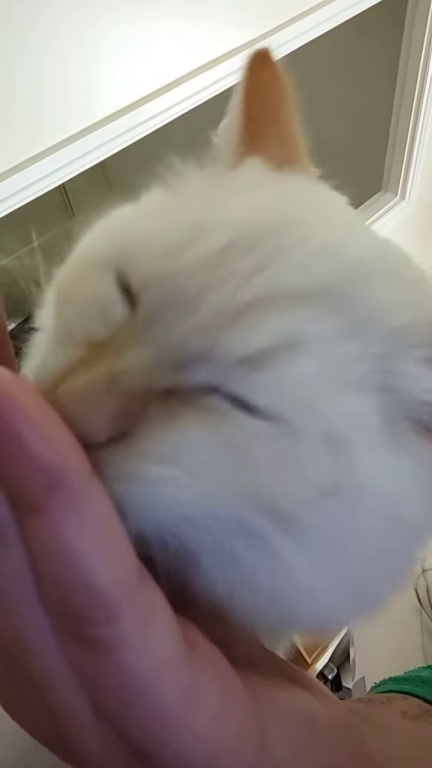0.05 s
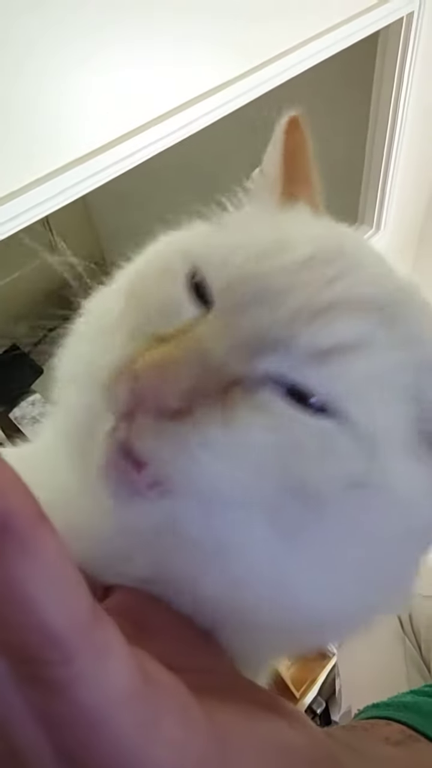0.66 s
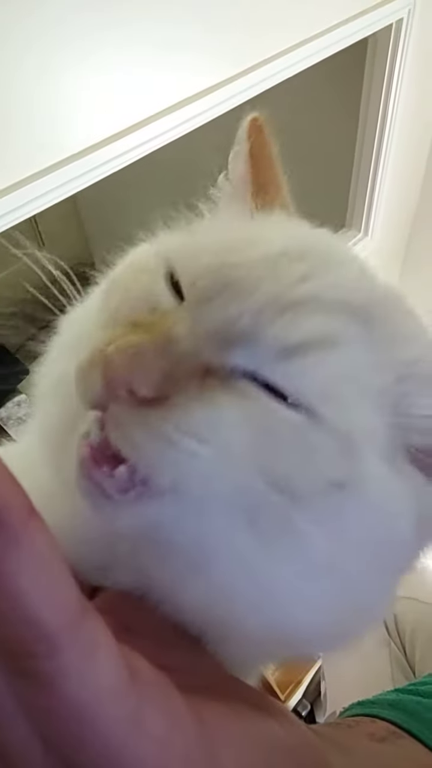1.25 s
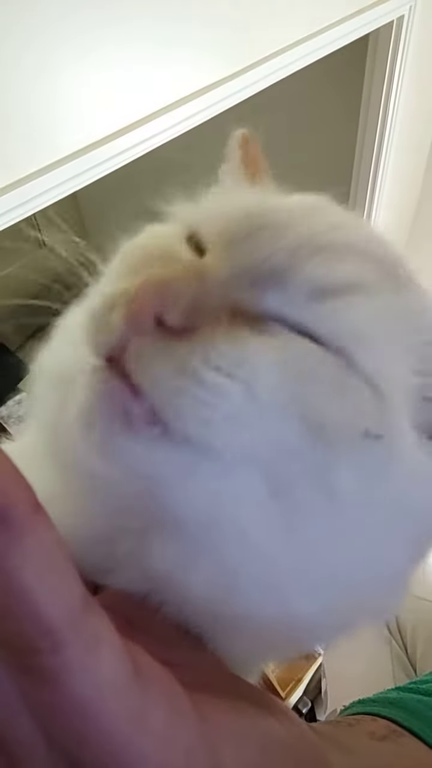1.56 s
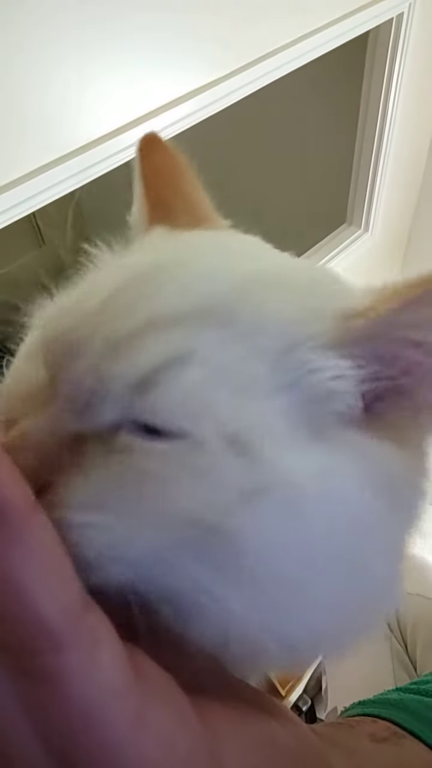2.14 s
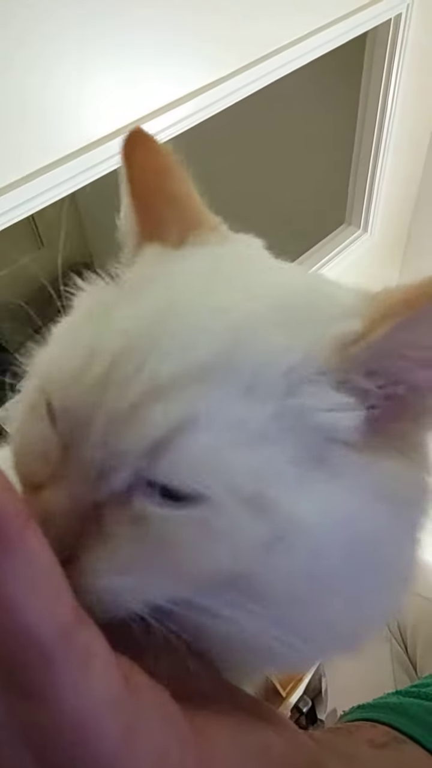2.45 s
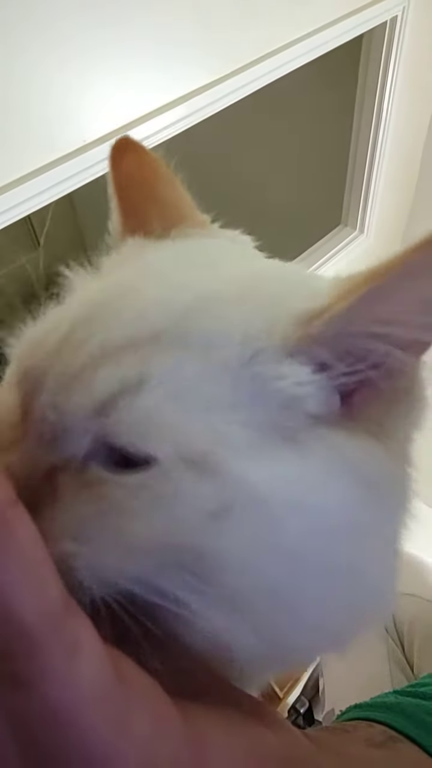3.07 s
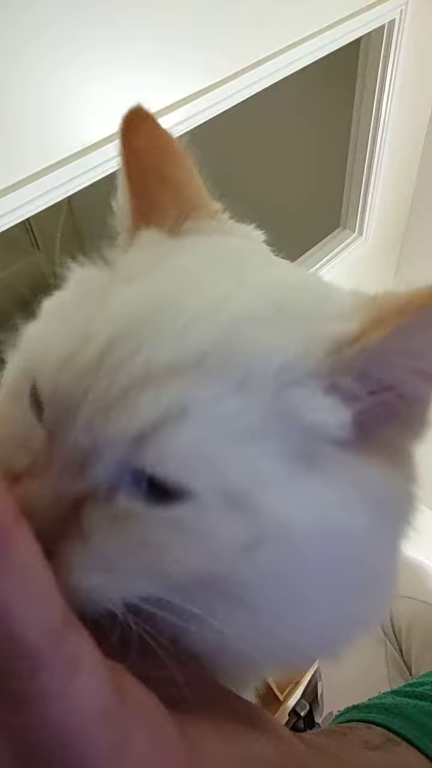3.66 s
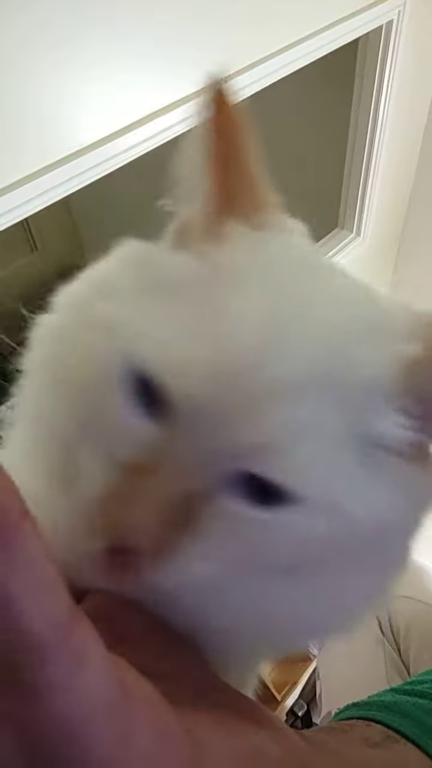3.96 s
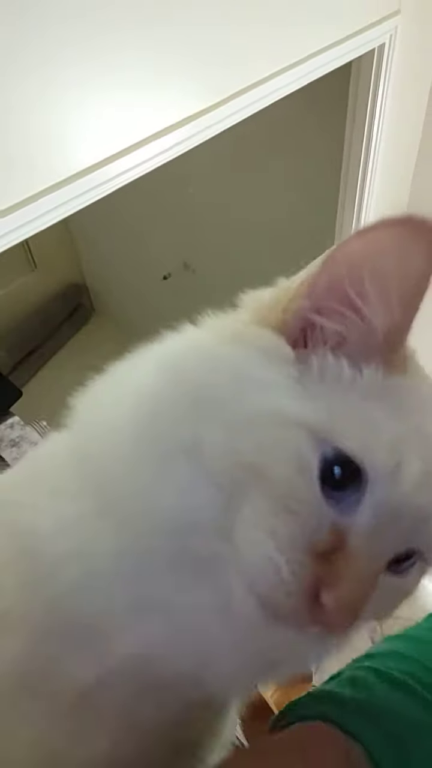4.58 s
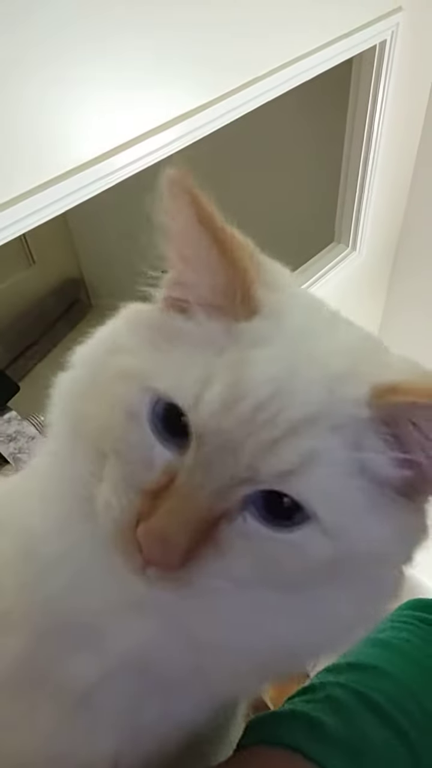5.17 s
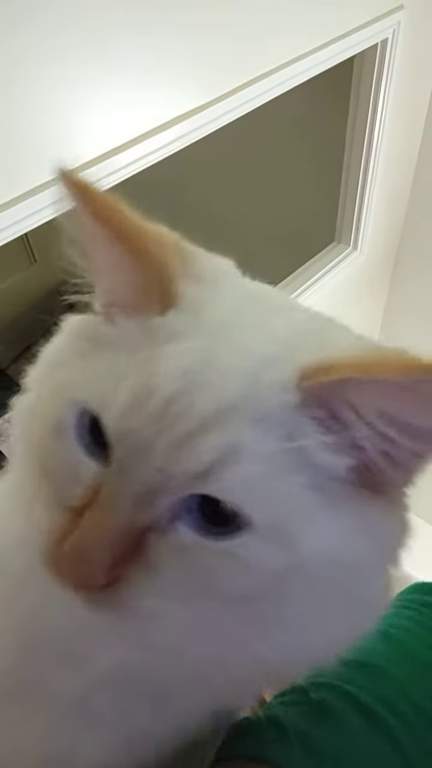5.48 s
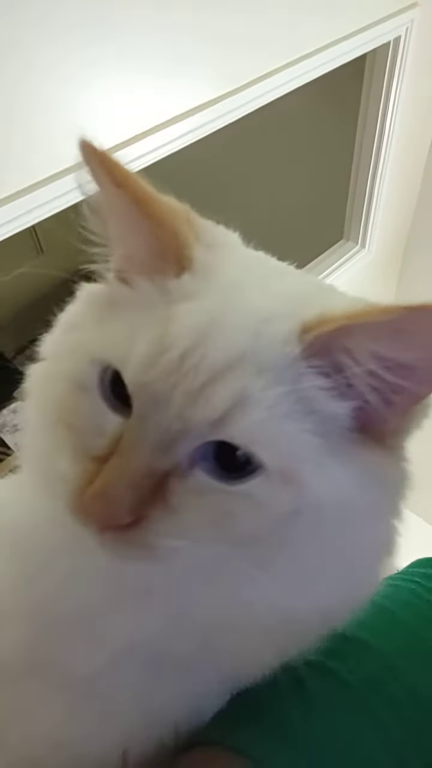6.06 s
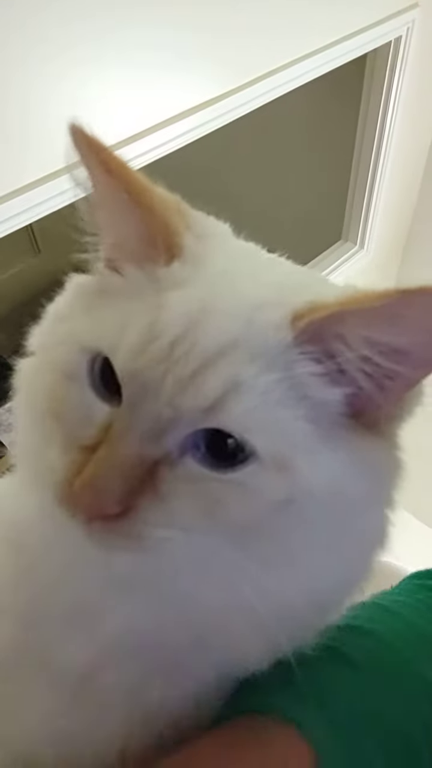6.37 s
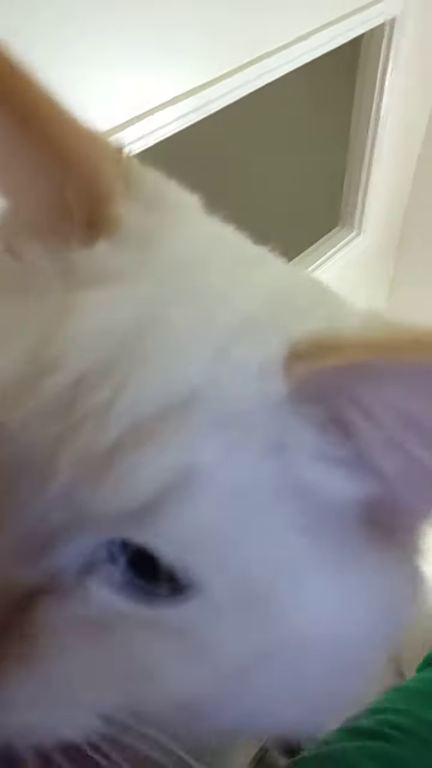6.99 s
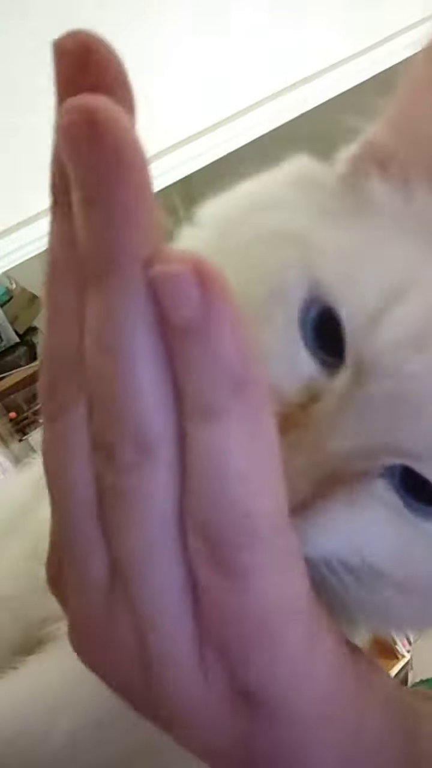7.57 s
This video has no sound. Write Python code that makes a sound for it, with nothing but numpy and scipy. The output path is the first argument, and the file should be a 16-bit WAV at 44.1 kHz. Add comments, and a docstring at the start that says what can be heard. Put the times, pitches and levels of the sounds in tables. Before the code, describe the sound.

A cat nuzzles a hand with small wet mouth clicks in a quiet room, then close scrapes and knocks come from handling the microphone.

```python
"""A low hum fills a quiet room, and a cat's lips and teeth click wetly as it nuzzles and mouths a hand
right at a handheld camera. Each click is a wet film breaking, which makes the mouth ring; fur brushes
the hand, there is one faint squeak, and the room echoes. Then the grip shifts: skin and fur scrape in
short strokes over the camera's plastic case, which knocks, snaps and sets a small spring ringing."""
import sys
import numpy as np
from scipy import signal
from scipy.fft import rfft, irfft, next_fast_len
from scipy.io import wavfile
from scipy.ndimage import map_coordinates

SR = 44100
rng = np.random.default_rng(int(sys.argv[2]) if len(sys.argv) > 2 else 0)


def materialize(psi):
    """Save the field psi as 16-bit PCM at rate SR to the path in sys.argv[1].

    A 1-D psi becomes a single channel; in a 2-D psi each row is a channel.
    """
    bounded = np.clip(np.atleast_2d(psi).T, -1, 1)
    quanta = np.round(bounded * 32767).astype(np.int16)
    wavfile.write(sys.argv[1], SR, quanta)


N = 345303
T = np.arange(next_fast_len(SR // 9)) / SR  # time axis of one short sound [s]

# A fade time (t60) is how long a sound takes to drop 60 dB. A side is left level minus right level.
# the tone of the still air: (frequency [Hz], relative level [dB])
AIR_COLOUR = [(25, -8), (55, -6.5), (85, 0), (160, 6.5), (260, 0.5), (500, -2), (1000, -10), (1800, -9),
              (3000, -14), (5000, -15.5), (8000, -17.5), (12000, -22), (15500, -25.5)]
# how alike the air sounds left and right: (frequency [Hz], likeness [-1 to 1])
AIR_LIKENESS = [(60, 0.36), (180, 0.71), (550, 0.26), (1650, -0.04), (4970, -0.02), (15000, -0.082)]
# the tones of an appliance's hum: (pitch [Hz], average level [dB])
HUM_TONES = [(100, -74), (200, -76.5), (300, -79.5)]
# how long the room echoes: (frequency [Hz], fade time [s])
ROOM_FADE = [(150, 0.4), (700, 0.71), (2200, 0.35), (5000, 0.44), (9000, 0.55), (15000, 0.17)]
# the tones of a small metal spring in the camera: (pitch [Hz], relative level [dB], fade time [s])
SPRING_TONES = [(4150, -6.5, 0.35), (7450, 2.5, 0.56), (7900, -3, 0.62), (8760, 5.5, .55), (9268, 4, 0.4),
                (10110, 0, .5), (13000, -5, .6)]
# the tones of the plastic case; wider ones die sooner: (pitch [Hz], width [Hz], relative level [dB])
CASE_TONES = [(368, 19, -15.5), (740.5, 51, -8), (1241, 29, -8), (1587, 52, -1), (2244, 44, 1.5),
              (2994, 52, -11.5), (3125, 23, -6.5), (4100, 50, 1), (5019, 87, -7), (5343, 41, -9.5),
              (5830, 30, -24.5), (6087, 71, -14.5), (6310, 41, -11.5), (6550, 26, -20.5), (7320, 53, -15),
              (7600, 36, -17.5), (8550, 95, -27), (9290, 64, -26.5), (9860, 85, -17.5), (11560, 60, -26),
              (12040, 76, -26.5), (13000, 170, -24.5), (14000, 64, -22.5), (14900, 35, -10.5),
              (15300, 42, -23.5), (15400, 110, -20)]
# how the case shares its sound between the microphones: (frequency [Hz], side [dB])
CASE_SIDES = [(200, -1.5), (400, -2), (700, -5), (1300, -2), (2400, -7.5), (4400, -1.5), (6100, -8),
              (7400, 6), (9000, -2.5), (11000, -1.5), (12500, -5), (15000, -7)]
# the tone of the noise a touch makes on the case: (frequency [Hz], relative level [dB])
CONTACT_COLOUR = [(100, -15.5), (220, -18.5), (340, -1), (490, -18), (760, 0), (980, -15), (1270, 0.5),
                  (1700, -2), (2300, 1), (3000, -1.5), (4400, 0), (5400, -7), (7000, -14), (10700, -20.5),
                  (14600, -15.5)]
# soft bumps of skin on the case: (time [s], level [dB], pitch [Hz], fade time [s], side [dB])
SKIN_BUMPS = [(0.492, -40.5, 353, 0.014, -22), (1.118, -34.5, 280, 0.0215, -26),
              (1.611, -62, 70, 0.12, 0.5), (2.469, -48.5, 301, 0.03, -2.5), (4.698, -26.5, 763, 0.05, -11),
              (4.7245, -23, 810, 0.019, -4), (4.725, -33.5, 300, 0.035, -8.5),
              (4.773, -40.5, 734, 0.038, -4.5), (5.42, -41.5, 340, 0.14, -3), (5.515, -44, 338, 0.097, -2),
              (6.25, -51, 205.4, 0.075, 0), (6.715, -44, 336, 0.36, 1), (6.718, -60.5, 60, .15, 0),
              (6.812, -42, 347, 0.28, 4.5)]
# strokes of the sliding grip: (start [s], length [s], level [dB], hiss relative to the scrape [dB])
GRIP_STROKES = [(4.998, 0.11, -43, -17), (5.168, 0.037, -44.5, -12.5), (5.25, 0.049, -49.5, -13.5),
                (5.345, 0.059, -49, -15), (5.437, .08, -46, -17), (5.565, 0.032, -48, -19),
                (5.712, 0.03, -46.5, -14), (5.787, 0.021, -44, -10), (5.902, 0.083, -47, -16),
                (6.035, 0.015, -49, -24), (6.222, 0.015, -43, -7), (6.315, .05, -39.5, -13),
                (6.43, .035, -44, -19)]
# how soft skin dulls the scrape: (frequency [Hz], gain [dB])
SKIN_DULLING = [(50, -14), (200, 3), (700, 4.5), (1250, 3), (2100, 2), (3000, 0), (4200, -2), (8000, -1),
                (12000, -12)]
# the fine hiss of fur on the case: (frequency [Hz], relative level [dB])
FUR_COLOUR = [(7000, -25), (11000, -14.5), (12500, -6), (13700, -8), (14700, -0.5), (15700, -7.5)]
# knocks of the grip: (time [s], level [dB], relative level of the bright edge [dB])
GRIP_KNOCKS = [(4.7202, -30.5, -13.5), (4.945, -41.5, -21), (4.982, -43.5, -13), (5.029, -40, -5),
               (5.052, -40.5, -15), (5.082, -35.5, -22), (5.189, -34.5, -14.5), (5.362, -44.5, -14),
               (5.441, -39.5, -30), (5.458, -37.5, -30), (5.56, -37, -8.5), (5.577, -36, -14),
               (5.599, -32, -21.5), (5.759, -32.5, -9.5), (5.781, -31.5, -17), (5.968, -39.5, -8),
               (6.044, -33.5, -19), (6.177, -34, -38), (6.218, -30.5, -4.5), (6.232, -31, -4.5),
               (6.304, -43, -18), (6.317, -31, -18), (6.338, -31, -6), (6.367, -25, -6.5),
               (6.391, -36.5, -22), (6.429, -35.5, -12), (6.437, -22, -21.5), (6.4615, -25, -26),
               (6.55, -32.5, -26), (6.5881, -37, -23.5), (6.633, -37.5, -20), (6.7136, -15, -5),
               (6.718, -17.5, -8), (6.7234, -11.5, -8.5), (6.735, -21.5, -5.5), (6.76, -24, -19.5),
               (6.811, -17, -12.5), (6.838, -24, -15), (6.844, -21.5, -15), (6.869, -33, -16)]
# the low thud in those knocks: (time [s], relative level [dB])
KNOCK_THUD = [(5.05, -4), (5.2, -21), (6.72, -19.5), (6.76, -10)]
# the tones of a seam in the case: (pitch [Hz], relative level [dB], fade time before limiting [s])
SEAM_TONES = [(2030, -4.5, 0.032), (2810, -8, 0.18), (3730, 2, 0.21), (3973, -5, 0.044), (4300, -8.5, 0.27),
              (4900, -7, 0.048), (5340, -14, 0.43), (5804, -6, 0.27), (6336, -18, 0.044), (7418, -27, 0.21),
              (8624, -38.5, 5.0), (13540, -25.5, 0.58), (14840, -14.5, 0.045), (15290, -9.5, 0.024)]
# fur brushing the hand: (time of peak [s], level at peak [dB], half length [s], centre pitch [Hz])
FUR_BRUSHES = [(2.519, -68.5, 0.091, 596), (3.823, -74, 0.055, 2100), (4.083, -72, 0.042, 3180),
               (4.233, -65.5, 0.055, 2230), (4.637, -72.5, 0.28, 5230), (4.746, -50, 0.027, 1240)]
# the tone of a wet film cracking: (frequency [Hz], relative level [dB])
CRACK_COLOUR = [(100, -19), (200, -7), (400, -3), (600, -15), (850, -6.5), (1300, -9), (2100, 8.5),
                (3200, 0), (4500, -1), (5800, -8.5), (7500, -9), (9500, -27.5), (15000, -17)]
# lip, tongue and tooth clicks: (time [s], level [dB], mouth pitch [Hz], sharpness [dB])
MOUTH_CLICKS = [(0.125, -39.5, 2950, -7), (0.231, -42.5, 2520, -15), (0.261, -50.5, 2100, -8),
                (0.749, -42, 1880, -10), (0.813, -24.5, 2010, -10.5), (0.951, -48, 1907, -14),
                (1.006, -47, 2420, -9), (1.034, -44, 2060, -9), (1.28, -39.5, 2200, -10.5),
                (1.318, -39, 2300, -16), (1.3684, -28.5, 2030, -11.5), (1.394, -19.5, 2010, -8),
                (1.618, -47, 2130, -5.5), (1.83, -44, 1900, -14.5), (2.444, -44.5, 2450, -16),
                (2.694, -58, 2930, -18), (3.536, -62, 2950, -15), (3.826, -54.5, 2080, -15),
                (4.062, -61.5, 3170, -13), (4.228, -53.5, 2310, -7), (4.245, -58.5, 2300, -1.5),
                (7.479, -48.5, 2500, -22), (7.534, -61.5, 3300, -5), (7.581, -58, 3300, -8.5),
                (7.614, -62, 3444, -5.5), (7.751, -61, 2296, 5.5)]


def amp(db):
    """Turns decibels into a gain to multiply by."""
    return 10 ** (np.asarray(db) / 20)


def unit(x):
    """Scales a sound to an average (rms) level of 1."""
    return x / np.sqrt(np.mean(x ** 2) + 1e-20)


def same_energy(x):
    """Gives a short stereo sound the energy of two milliseconds at full level."""
    return x / np.sqrt(np.sum(x ** 2) / 2 / (SR / 500) + 1e-20)


def along(points, hz):
    """Reads between (frequency, value) points, with octaves evenly spaced."""
    freqs, values = np.transpose(points)
    return np.interp(np.log(hz + 1), np.log(np.sort(freqs) + 1), values)


def pan(side_db):
    """Left and right gains; a positive side is louder on the left."""
    return unit(amp([[side_db / 2], [-side_db / 2]]))


def wobble(rate):
    """A smooth curve through `rate` random values a second."""
    times = np.arange(0, N + 64, 64) / SR
    values = rng.standard_normal(int(N * rate / SR) + 4)
    return np.interp(np.arange(N) / SR, times, map_coordinates(values, [times * rate]))


def filtered(x, response):
    """Turns each frequency up or down by the gain response(hz)."""
    n = x.shape[-1]
    size = next_fast_len(n + 8192)
    return irfft(rfft(x, size) * response(np.fft.rfftfreq(size, 1 / SR)), size)[..., :n]


def coloured(x, points):
    """Shapes a sound's tone to follow (frequency, level) points."""
    size = 2 * len(T)
    cepstrum = irfft(np.log(amp(along(points, np.fft.rfftfreq(size, 1 / SR)))))
    cepstrum[1:size // 2] *= 2  # folded forward, so nothing rings before the sound starts
    cepstrum[size // 2 + 1:] = 0
    response = irfft(np.exp(rfft(cepstrum)))[None, :len(T)]
    return signal.fftconvolve(x, response, axes=1)[:, :x.shape[1]]


def keep_side(x, hz, kind):
    """Keeps what lies on the "low" or "high" side of a frequency."""
    return signal.sosfilt(signal.butter(4, hz, kind, fs=SR, output="sos"), x)


def between(x, low_hz, high_hz):
    """The part of a short sound between two frequencies, always with the same energy."""
    return same_energy(keep_side(keep_side(x, low_hz, "high"), high_hz, "low"))


def burst(t60):
    """Fading noise, different at the two microphones."""
    return rng.standard_normal((2, len(T))) * amp(-60 * T / t60)


def ring(hz, t60, lag=0):
    """One fading tone; it reaches the right microphone `lag` seconds later."""
    t = np.maximum(T - np.array([[0], [lag]]), 0)
    return np.sin(2 * np.pi * hz * t) * amp(-60 * t / t60)


def later(x, delay_s):
    """Delays a short sound."""
    return np.pad(x, ((0, 0), (round(delay_s * SR), 0)))[:, :len(T)]


def add(track, start_s, sound):
    """Mixes a sound into a track."""
    part = track[:, round(start_s * SR):][:, :sound.shape[1]]
    part += sound[:, :part.shape[1]]


def still_air():
    """The soft rush of a quiet room, with a faint, narrow hiss."""
    size = next_fast_len(N)
    hz = np.fft.rfftfreq(size, 1 / SR)
    spread = np.arccos(along(AIR_LIKENESS, hz)) / 2
    peak = lambda centre_hz, width_hz: 1 / (1 + ((hz - centre_hz) / width_hz) ** 2)
    colour_db = along(AIR_COLOUR, hz) + 6.3 * peak(4250, 130) + 5.5 * peak(6580, 150)
    colour_db -= 4.9 * peak(5800, 490)
    noise = rfft(rng.standard_normal((2, size))) * amp(colour_db)
    shared, opposed = irfft(noise * [np.cos(spread), np.sin(spread)])[:, :N]
    return amp(-68) * unit(np.array([shared + opposed, shared - opposed]))


def hum():
    """An appliance hums in low, slightly unsteady tones."""
    phase = 2 * np.pi * np.arange(N) / SR
    return sum(amp(db + 1.4 * wobble(4.6)) * np.sqrt(2) * np.sin(hz * phase + .35 * wobble(4.5))
               for hz, db in HUM_TONES)


def room_echo(x):
    """The walls throw sound back; each frequency fades at its own speed."""
    hz, t, noise = signal.stft(rng.standard_normal((2, SR // 2)), SR, nperseg=256)
    fade = amp(-60 * t / along(ROOM_FADE, hz)[:, None])
    rise = 1 - np.exp(-t / 0.011)
    tail = signal.istft(noise * fade * rise, SR, nperseg=256)[1]
    return signal.fftconvolve(x, tail / np.linalg.norm(tail[0]), axes=1)[:, :N]


def spring(jolts):
    """Every jolt shakes the spring and leaves a thin metallic ring behind."""
    t = np.arange(SR // 2) / SR
    tail = sum(amp(db - 60 * t / t60) * np.sin(2 * np.pi * hz * t + rng.uniform(0, 2.6, (2, 1)))
               for hz, db, t60 in SPRING_TONES)
    return signal.oaconvolve(jolts, tail / np.linalg.norm(tail[0]), axes=1)[:, :N]


def case_rings():
    """Each tone of the case ringing freely; it reaches the left microphone a little later."""
    t = T - np.array([[.00017], [0]])
    phases = rng.uniform(0, 2 * np.pi, len(CASE_TONES))
    return np.array([amp(db) * np.sqrt(width) * np.exp(-np.pi * width * T)
                     * np.sin(2 * np.pi * hz * t + phase)
                     for (hz, width, db), phase in zip(CASE_TONES, phases)])


def case_tap(rings, noise_db, noise_t60):
    """One touch rings the strong tones at random strengths; the many weak ones blur into noise."""
    strengths = amp(rng.normal(0, 3.5, (len(rings), 1, 1)))
    tones = same_energy(np.sum(rings * strengths, axis=0))
    noise = same_energy(coloured(burst(noise_t60), CONTACT_COLOUR))
    return same_energy(tones + amp(noise_db) * noise)


def case_balance(hz):
    """Left and right gains: the case carries most frequencies better to the right microphone."""
    gains = amp(along(CASE_SIDES, hz) * np.array([[.5], [-.5]]))
    return gains / np.sqrt(np.mean(gains ** 2, axis=0))


def bumps():
    """Soft skin pushes the case once, and a dull tone dies away."""
    out = np.zeros((2, N))
    rise = 1 - np.exp(-T / 0.0002)
    for s, db, hz, t60, side_db in SKIN_BUMPS:
        push = ring(hz, t60) + 0.16 * ring(hz * 1.37, t60) + 0.33 * keep_side(burst(t60), hz * 2, "low")
        add(out, s, amp(db - 2.5) * pan(side_db) * keep_side(push * rise, hz * 0.25, "high"))
    return out


def stroke(t, length, rise_s=0.017, fade_db_per_s=261):
    """Gain of one slide, t seconds after its start: it takes hold, stays, then runs out."""
    return np.clip(t / rise_s + .5, 0, 1) * amp(-fade_db_per_s * np.maximum(t - length, 0))


def grip():
    """Gains of the scrape and of its hiss: the strongest slide under way sets each."""
    t = np.arange(0, N, 64) / SR
    creep = (4.92, 1.57, -57.5, -15)  # one long, faint slide: the skin still creeps between strokes
    slides = [amp([[db], [db + hiss_db]]) * stroke(t - s, length)
              for s, length, db, hiss_db in GRIP_STROKES + [creep]]
    return [np.interp(np.arange(N) / SR, t, gain) for gain in np.max(slides, axis=0)]


def scrape(rings, spots=4, slips_per_s=300):
    """Clumps of tiny slips tap the case at several spots; fur adds a fine hiss."""
    rub_gain, hiss_gain = grip()
    rub, all_slips = np.zeros((2, N)), np.zeros((1, N))
    for _ in range(spots):
        at = rng.integers(0, N, size=int(slips_per_s * N / SR))
        sizes = rng.choice([-1, 1], len(at)) * amp(3.5 * np.minimum(rng.exponential(size=len(at)), 3.5))
        clumps = amp(3.7 * np.tanh(wobble(22)))
        slips = (np.bincount(at, sizes, N) * clumps)[None]
        rub += signal.oaconvolve(slips, case_tap(rings, noise_db=7.5, noise_t60=0.0099), axes=1)[:, :N]
        all_slips += slips
    hiss = signal.oaconvolve(all_slips, coloured(burst(.006), FUR_COLOUR), axes=1)[:, :N]
    rub = filtered(rub, lambda hz: amp(along(SKIN_DULLING, hz)))
    return rub_gain * unit(rub) + hiss_gain * unit(hiss)


def knocks(rings):
    """The grip sticks and lets go; heavy slips thud, hard ones clack and have a bright edge."""
    out = np.zeros((2, N))
    rise = 1 - np.exp(-T / 0.0004)
    for s, db, edge_db in GRIP_KNOCKS:
        tap = case_tap(rings, noise_db=-2.5, noise_t60=0.042) * rise
        thud = amp(np.interp(s, *np.transpose(KNOCK_THUD))) * between(tap, 370, 950)
        body = between(tap, 840, 3100)
        clack = amp(3 + 0.4 * edge_db) * between(tap, 3400, 8700)
        edge = amp(edge_db) * between(tap, 9500, 18000)
        add(out, s, amp(db) * (thud + body + clack + edge))
    return out


def snap(start_s=6.688, open_s=.028):
    """A seam of the case springs free and rings briefly until it is pressed shut."""
    out = np.zeros((2, N))
    tones = sum(amp(db) * ring(hz, np.clip(t60, .03, .14), lag=.0001) for hz, db, t60 in SEAM_TONES)
    closing = amp(-60 * np.maximum(T - open_s, 0) / .03)
    ping = same_energy(keep_side(tones, 900, "high") * closing) * pan(-17.5)
    crack = same_energy(coloured(burst(.03), CONTACT_COLOUR))
    add(out, start_s, amp(-15) * ping + amp(-25.5) * crack)
    return out


def squeak(start_s=3.47, length_s=0.19):
    """A faint, thin, wavering tone that swells, then sags in pitch."""
    out = np.zeros((2, N))
    progress = np.linspace(0, 1, int(length_s * SR))
    hz = 2560 - 300 * progress ** 4 + 15 * wobble(150)[:len(progress)]
    tone = np.sin(2 * np.pi * np.cumsum(hz) / SR)
    add(out, start_s, amp(-79.5) * pan(3) * np.sin(np.pi * progress) * tone)
    return out


def brushes():
    """Hairs slide past the skin in short, soft, grainy swells."""
    out = np.zeros((2, N))
    for peak_s, db, half_s, hz in FUR_BRUSHES:
        swell = np.hanning(int(2 * half_s * SR))
        hairs = rng.standard_normal((2, len(swell))) * rng.exponential(size=len(swell))
        fur = signal.sosfilt(signal.butter(2, [hz * 0.65, hz * 1.42], "band", fs=SR, output="sos"), hairs)
        add(out, peak_s - half_s, amp(db) * unit(fur) * swell)
    return out


def mouth(step_gap_s=.006, second_step_db=-8.5, centre_hz=2100, left_db_per_octave=12.5):
    """A wet film breaks in two steps: each is a tiny crack that briefly rings the hollow of the mouth."""
    out = np.zeros((2, N))
    second = amp(second_step_db)
    for s, db, hz, sharp_db in MOUTH_CLICKS:
        octaves = np.log2(hz / centre_hz)
        delay = step_gap_s * rng.uniform(.7, 1.3)
        hollow = ring(hz, 0.015, lag=0.00022) + 0.32 * ring(hz * 1.18, 0.03, lag=0.00018)
        hollow += second * later(ring(hz * 1.076, 0.016, lag=0.00022), delay)
        noise = burst(0.019) + second * later(burst(0.0165), delay) + amp(-13.5) * burst(0.084)
        crack = coloured(noise, CRACK_COLOUR)
        body = same_energy(between(hollow, 2030, 3780) + amp(-4) * between(crack, hz * 0.85, hz * 1.6))
        plop = amp(-13 - 14 * octaves) * between(crack, 100, 1320)  # a narrow mouth: higher, less plop
        edge = amp(sharp_db) * between(crack, 3220, 13000)
        add(out, s, amp(db) * pan(left_db_per_octave * octaves) * (body + plop + edge))
    return out


def scene():
    """The cat is heard through the air, the handling mostly through the case; both echo in the room."""
    rings = case_rings()
    cat = mouth() + brushes() + squeak()
    handling = filtered(knocks(rings) + scrape(rings), case_balance) + snap() + bumps()
    airborne = keep_side(amp(-15) * cat + amp(-17.5) * handling, 6000, "low")
    return cat + handling + amp(-19.5) * spring(handling) + room_echo(airborne) + still_air() + hum()


def record(dry, ceiling=.7, top_hz=15700):
    """The camera rounds off the tallest peaks and cuts the highest treble."""
    rounded = dry / (1 + np.abs(dry / ceiling) ** 6) ** (1 / 6)
    return filtered(rounded, lambda hz: 1 / (1 + (hz / top_hz) ** 120))


dry = scene()
out = record(dry)
materialize(out)
```